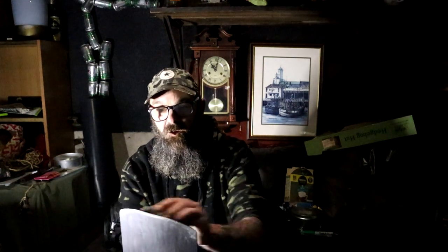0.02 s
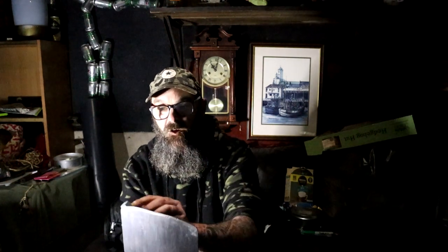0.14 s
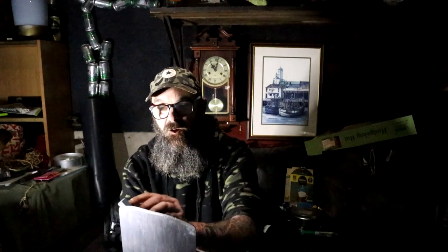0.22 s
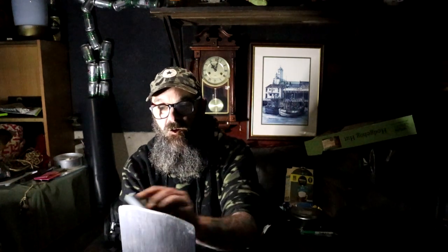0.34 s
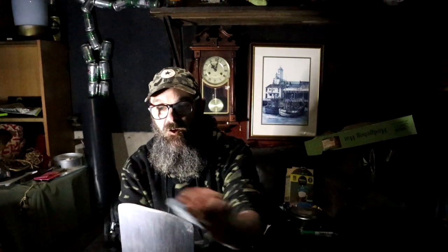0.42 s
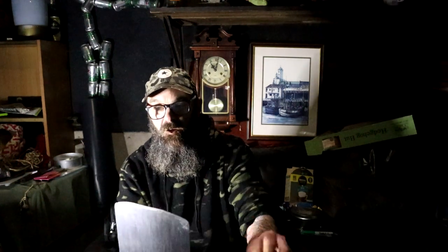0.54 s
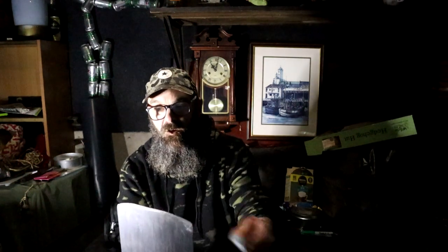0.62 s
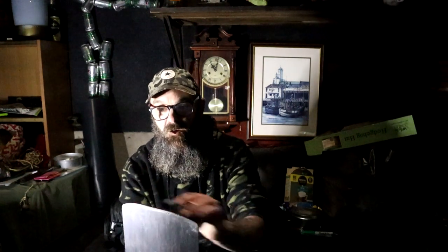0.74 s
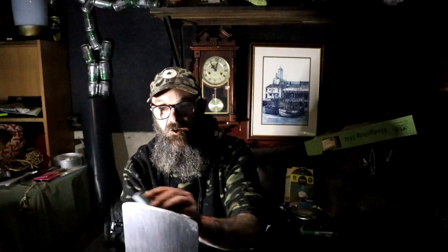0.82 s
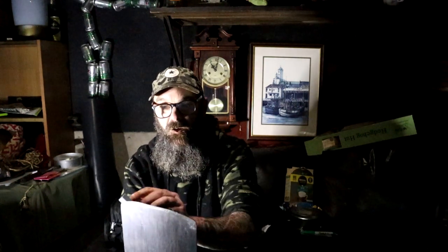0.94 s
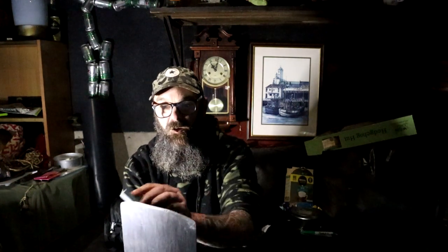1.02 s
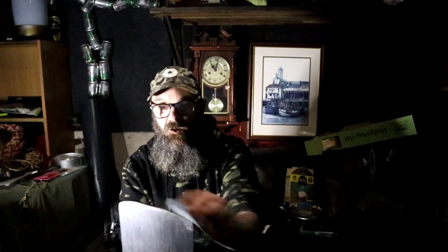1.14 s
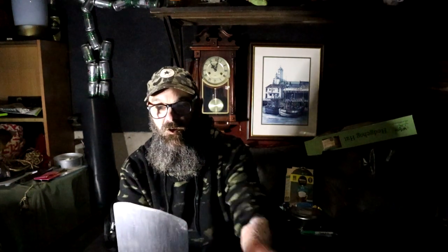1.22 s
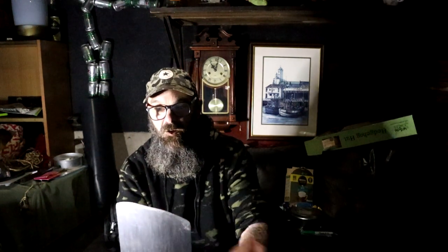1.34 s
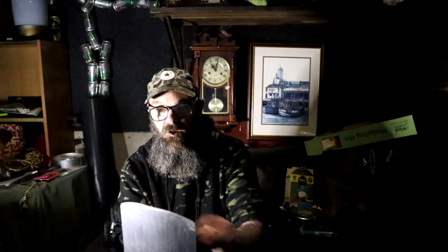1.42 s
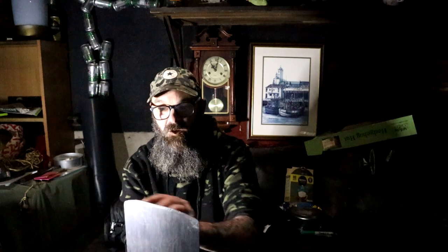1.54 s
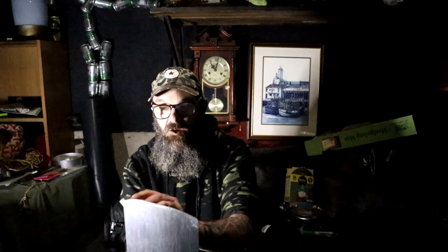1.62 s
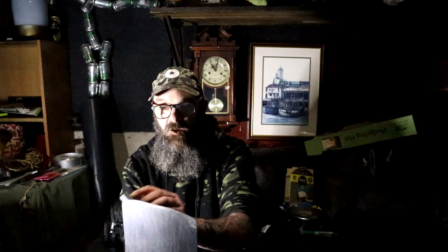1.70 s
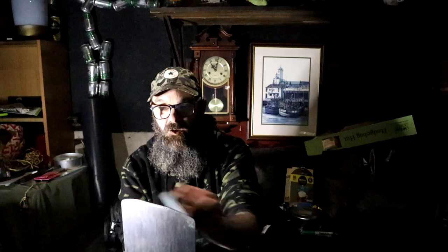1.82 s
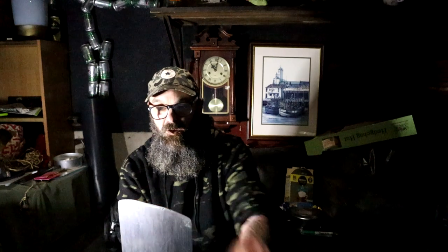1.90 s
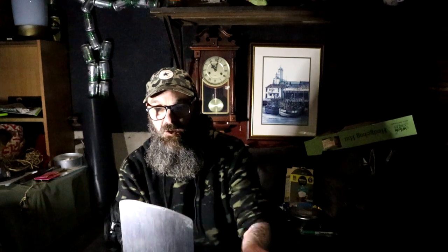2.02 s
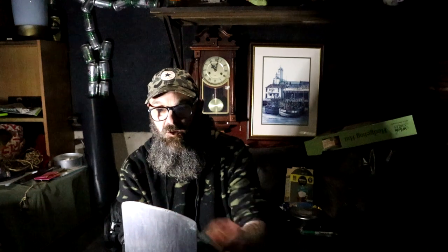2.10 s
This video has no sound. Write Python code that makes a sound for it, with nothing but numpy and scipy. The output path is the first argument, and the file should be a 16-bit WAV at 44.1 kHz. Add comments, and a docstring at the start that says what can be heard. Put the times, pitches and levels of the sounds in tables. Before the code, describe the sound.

Close and dry in a small shed: three quick abrasive strokes on thin steel, starting with a clink and growing harsher until the stone slips off and the blade rings briefly, with quiet creaking ticks during the back-swings.

```python
"""A sharpening stone strokes a steel spade three times in a small shed.
At first the blade still rings from the stroke before, and something under load, probably the handle or
the seat, creaks in dry ticks. Then, in each stroke, the stone knocks on the edge, drags lightly, bites in
a loud gritty rasp (grains shaking the blade's modes) and slips off, leaving the blade to ring freely.
While the arm swings back the creak returns, as it does after the last stroke."""
import sys
import numpy as np
from scipy import signal
from scipy.fft import rfft, irfft
from scipy.io import wavfile
from scipy.ndimage import uniform_filter1d, minimum_filter1d

SR = 44100
rng = np.random.default_rng(int(sys.argv[2]) if len(sys.argv) > 2 else 0)


def persist_wave(psi):
    """Save psi, clipped to +-1, as 16-bit WAV."""
    counts = np.round(np.clip(psi, -1, 1) * 32767).astype(np.int16)
    wavfile.write(sys.argv[1], SR, np.atleast_2d(counts).T)


N = 97020  # length of the scene in samples


def undb(db):
    """Turn decibels into a plain amplitude factor."""
    return 10 ** (np.asarray(db) / 20)


def unit(x):
    """Scale to rms 1."""
    return x / np.sqrt(np.mean(x ** 2))


def unit_hit(x):
    """Scale a short sound to rms 1 over its first hundredth of a second."""
    return x / np.sqrt(np.mean(x[:SR // 100] ** 2))


def colour(x, points):
    """Shape the spectrum of x through (Hz, dB) points, with a filter that never sounds early."""
    hz, db = np.array(points, float).T
    size = 2 * N
    f = np.maximum(np.fft.rfftfreq(size, 1 / SR), 1)
    log_gain = np.log(undb(np.interp(np.log(f), np.log(hz), db)))
    # folding the cepstrum gives the minimum-phase filter
    cepstrum = irfft(log_gain)
    cepstrum[1:N] *= 2
    cepstrum[N + 1:] = 0
    return irfft(rfft(x, size) * np.exp(rfft(cepstrum)))[:N]


def resonate(x, modes):
    """Ring (Hz, width Hz, dB) resonances; wide ones die fast, and each pushes or pulls the air."""
    t = np.arange(SR // 6) / SR
    ring = np.zeros(len(t))
    for hz, width, db in modes:
        strength = rng.choice([-1, 1]) * undb(db) * width
        ring += strength * np.exp(-np.pi * width * t) * np.cos(2 * np.pi * hz * t)
    return signal.oaconvolve(x, ring)[:N]


def flutter(rate_hz):
    """A random wobble of rms 1: straight lines between rate_hz random points per second."""
    points = rng.standard_normal(N // 20)
    return unit(np.interp(np.arange(N) / SR * rate_hz, np.arange(N // 20), points))


def place(x, start_s):
    """Delay a sound to its moment."""
    return np.concatenate([np.zeros(max(int(start_s * SR), 0)), x])[:N]


# The strokes. Each row: stone lands in seconds, stone leaves in seconds, relative level of the free ring in dB.
STROKE_TIMES = [(0.1967, 0.514, 0), (0.9694, 1.241, -.5), (1.666, 1.939, -.5)]
# How each stroke scrapes, one list per stroke. Each row: time in seconds, level of the rasp in dB,
# level of the low grind in dB (both before the slopes and balance below).
SCRAPE_LEVELS = [
    [(0.196, -24, -25.5), (0.222, -23.5, -32), (0.228, -21.5, -35), (0.264, -36, -41.5),
     (0.272, -25.5, -64.5), (0.294, -38.5, -47), (0.31, -24.5, -54), (0.368, -29.5, -29.5),
     (0.39, -11, -32), (0.458, -8.5, -15), (0.484, -12, -22.5), (0.496, -3.5, -28.5), (0.512, -24.5, -38)],
    [(0.985, -16, -22), (1.001, -33.5, -35), (1.053, -30, -34), (1.093, -19.5, -23.5), (1.101, -15, -24.5),
     (1.165, -9.5, -17), (1.177, -10, -14), (1.193, -12, -22), (1.211, -9, -28), (1.217, -5, -33.5),
     (1.238, -18.5, -42)],
    [(1.675, -29, -29), (1.685, -28.5, -21), (1.703, -25, -52.5), (1.743, -37, -47), (1.753, -29.5, -55),
     (1.763, -26.5, -49), (1.793, -22.5, -29), (1.799, -16.5, -31), (1.831, -14, -28), (1.837, -10, -33),
     (1.871, -6.5, -11.5), (1.925, -10.5, -31), (1.934, -14, -25.5)],
]
# Spectrum of the bright rasp. Each row: frequency in Hz, relative level in dB per Hz.
RASP_SPECTRUM = [(1000, -44.5), (2000, -17.5), (2800, 2.5), (4000, 3.5), (5000, -3.5), (5700, -2),
                 (6500, -12.5), (7400, -2.5), (8400, 1.5), (9900, -7), (10900, -3.5), (11400, -13),
                 (12500, -10.5), (15500, -28.5)]
# Spectrum of the low grind. Each row: frequency in Hz, relative level in dB per Hz.
GRIND_SPECTRUM = [(200, -23), (420, -39), (540, -10), (800, -7), (1000, -4), (1400, -0.5), (1800, 1),
                  (2600, -5.5), (4000, -43.5)]
# Modes of the blade with the stone resting lightly on it.
# Each row: frequency in Hz, width in Hz, relative level in dB.
LIGHT_MODES = [(1130, 16, -9), (1430, 24, -3), (2190, 90, -10), (2510, 69, -9), (2990, 40, -1),
               (3710, 44, 1), (4400, 110, -4), (4620, 61, -5), (5090, 130, -6), (5450, 55, -6),
               (6010, 55, -10), (7220, 30, -3.5), (7490, 66, -7), (8250, 55, -11), (8790, 68, -8),
               (9450, 89, -11), (10200, 69, -14), (10900, 140, -14), (12300, 150, -24), (15050, 90, -26)]
# Modes of the blade with the stone pressed hard. Each row: frequency in Hz, width in Hz, relative level in dB.
HARD_MODES = [(927, 38, -10), (1236, 32, -3), (1441, 32, 0), (1720, 90, -4), (2290, 80, -4), (2745, 45, -1),
              (3055, 55, 1), (3376, 45, -4.5), (3720, 40, 1), (3855, 55, 2), (4040, 90, -2), (4610, 130, 0),
              (4946, 80, 0), (5090, 60, -1), (5454, 35, -2), (6005, 55, -5), (7204, 40, -2), (7461, 55, -1),
              (7992, 50, -2), (8291, 45, -2), (9300, 160, -6), (10163, 40, -4), (10865, 90, -6),
              (12530, 70, -12), (14000, 60, -19), (14550, 90, -19)]
LAND_S, RELEASE_S = 0.0032, 0.0013  # time to make contact; decay time as contact ends
JUDDER_HZ, JUDDER_DB = 110, 1.8
RASP_DB, GRIND_DB, LIGHT_DB, HARD_DB = -8.5, -4, -9.5, -4  # balance of the four parts
# rasp level at full pressure; dB each set of modes grows per dB of rasp
FULL_DB, LIGHT_SLOPE, HARD_SLOPE = -7, 0.53, 1.68
GRIND_FULL_DB, GRIND_SLOPE = -15.5, 1.28  # the low grind dies away quickly as the pressure eases


def scraping(t):
    """Grit makes a bright rasp, a low grind when pressed hard, and rings the damped blade."""
    rasp, grind, light, hard = np.zeros((4, N))
    for (land, lift, _), rows in zip(STROKE_TIMES, SCRAPE_LEVELS):
        row_s, row_rasp_db, row_grind_db = np.array(rows).T
        contact = np.clip((t - land) / LAND_S, 0, 1) * np.exp(-np.maximum(t - lift, 0) / RELEASE_S)
        contact = contact * undb(JUDDER_DB * flutter(JUDDER_HZ))  # the stone judders in the hand
        rasp_db = np.interp(t, row_s, row_rasp_db)
        grind_db = np.interp(t, row_s, row_grind_db)
        rasp += contact * undb(rasp_db)
        light += contact * undb(FULL_DB + LIGHT_SLOPE * (rasp_db - FULL_DB))
        hard += contact * undb(FULL_DB + HARD_SLOPE * (rasp_db - FULL_DB))
        grind += contact * undb(GRIND_FULL_DB + GRIND_SLOPE * (grind_db - GRIND_FULL_DB))
    rasp_sound = rasp * unit(colour(grit(), RASP_SPECTRUM))
    grind_sound = grind * unit(colour(grit(), GRIND_SPECTRUM))
    direct = undb(RASP_DB) * rasp_sound + undb(GRIND_DB) * grind_sound
    blade = undb(LIGHT_DB) * rub(light, LIGHT_MODES) + undb(HARD_DB) * rub(hard, HARD_MODES)
    return direct + blade


GRIT_PER_S, GRIT_SPREAD_DB = 4500, 2  # average catches per second; average extra size of a catch
CHATTER_HZ, CHATTER_DB = 393.3, 1.5


def grit():
    """Abrasive grains catch on the steel at random, stronger and weaker with the chatter of the stone."""
    caught = rng.random(N) < GRIT_PER_S / SR
    extra = np.minimum(rng.exponential(size=N), 2 * np.pi)  # a cap on the largest catches
    push_or_pull = rng.choice([-1, 1], N)
    return caught * undb(GRIT_SPREAD_DB * extra) * push_or_pull * undb(CHATTER_DB * flutter(CHATTER_HZ))


MODE_WANDER_HZ, MODE_WANDER_DB = 27.815, 1.5  # the moving stone feeds now one mode, now another


def rub(force, modes):
    """Drive each mode with grit; its share wanders as the stone crosses still points of the blade."""
    push = grit() * force
    ring = np.zeros(N)
    for mode in modes:
        ring += resonate(push, [mode]) * undb(MODE_WANDER_DB * flutter(MODE_WANDER_HZ))
    return unit(ring) * np.sqrt(np.mean(force ** 2))  # as strong overall as the force


# Knocks of the stone as it lands or catches on the edge. Each row: start in seconds, level in dB.
KNOCK_HITS = [(.1945, -20.5), (.229, -30.5), (.2415, -27.5), (.269, -27.5), (.3215, -32.5), (.3875, -12),
              (.422, -9), (.9725, -6.5), (1.668, -18.5), (1.7975, -21.5)]
# Spectrum of the crack in a knock. Each row: frequency in Hz, relative level in dB per Hz.
KNOCK_SPECTRUM = [(100, -21), (300, -16), (600, -5.5), (1400, -9.5), (2400, -8.5), (3000, 12.5),
                  (4000, -7.5), (5000, -3), (8000, -6), (11000, -16.5), (16000, -30.5)]
KNOCK_DECAY_S, CLINK_DAMP_S, CRACK_DB, CLINK_DB = 0.0025, .02, -7, -1.5
# the clink's modes are turned down by this much per octave either side of the centre
CLINK_CENTRE_HZ, CLINK_TILT_DB = 3080, -10


def knocks(t):
    """The stone lands or catches: a short crack and a quickly damped clink."""
    modes = []
    for hz, width, db in LIGHT_MODES:
        octaves_away = abs(np.log2(hz / CLINK_CENTRE_HZ))
        modes.append((hz, width, db + CLINK_TILT_DB * octaves_away))
    out = np.zeros(N)
    for start_s, db in KNOCK_HITS:
        burst = rng.standard_normal(N) * np.exp(-t / KNOCK_DECAY_S)
        crack = unit_hit(colour(burst, KNOCK_SPECTRUM))
        clink = unit_hit(resonate(signal.unit_impulse(N), modes) * np.exp(-t / CLINK_DAMP_S))
        out += undb(db) * place(undb(CRACK_DB) * crack + undb(CLINK_DB) * clink, start_s)
    return out


LOW_CUT_HZ = 260  # the blade radiates little below this


def radiate(x):
    """The thin blade cancels its own bass."""
    return signal.sosfilt(signal.butter(2, LOW_CUT_HZ, "high", fs=SR, output="sos"), x)


# Modes of the free blade. Each row: frequency in Hz, relative level in dB as the stone leaves,
# time to fade by 60 dB in seconds.
FREE_BLADE_MODES = [(619, -44.5, .33), (958.5, -41, .34), (1167, -41.5, 1.25), (1366, -40, 1.15),
                    (2040, -38, .18), (2150, -40, .2), (1445.5, -29, .32), (1610, -33, .35),
                    (2262, -29, .13), (2525, -26, .57), (3070, -39, .18), (3714.5, -19, .275),
                    (3833, -27, .16), (4045, -22, .22), (4540, -40, .15), (4856, -40, .15),
                    (5685, -46, .14), (6002, -28.5, .1), (7074, -37, .09), (8177, -32, .1),
                    (8511, -40, .15), (10050, -49, .2), (10860, -34, .13)]
EARLIER_LIFT_S, EARLIER_RING_DB = -0.13, -7.5  # the blade still rings from the stroke before
RING_RISE_S = 0.013


def free_ring(t):
    """The blade's modes swell as the stone slips off and ring until it lands again."""
    lifts = [(EARLIER_LIFT_S, EARLIER_RING_DB)] + [(lift, db) for _, lift, db in STROKE_TIMES]
    landings = [row[0] for row in STROKE_TIMES] + [t[-1]]
    out = np.zeros(N)
    for (lift, ring_db), land in zip(lifts, landings):
        age = np.maximum(t - lift, 0)
        swell = np.minimum(t - lift, 0) / RING_RISE_S
        damping = np.maximum(t - land, 0) / RELEASE_S
        free = np.exp(swell - damping)
        for hz, db, t60 in FREE_BLADE_MODES:
            level = undb(ring_db + db + rng.standard_normal())  # varies a little at each stroke
            fade = np.exp(-np.log(1000) * age / t60)
            out += free * level * fade * np.sin(2 * np.pi * (hz * t + rng.random()))
    return out


# Ticks of the creak. Each row: start in seconds, level in dB.
CREAK_TICKS = [(.002, -45), (.012, -40.5), (0.022, -40.5), (.027, -41), (0.0353, -36), (.048, -36),
               (0.065, -35.5), (.1, -37.5), (.126, -36), (.726, -49.5), (.741, -52), (.747, -43.5),
               (.769, -42), (.782, -37.5), (.801, -35.5), (0.8365, -36), (0.9328, -44.5), (1.47, -42),
               (1.485, -46.5), (1.496, -41.5), (1.511, -41.5), (1.526, -36.5), (1.5698, -39), (1.64, -45),
               (2.123, -53), (2.136, -45.5), (2.151, -42), (2.166, -45), (2.18, -42), (2.195, -45)]
# Resonances of the creaking part. Each row: frequency in Hz, width in Hz, relative level in dB.
CREAK_RESONANCES = [(602, 38, -6), (1347, 150, -7), (2513, 480, -8.5), (3028, 52, 0.5), (3560, 8, -38),
                    (4060, 77, -3), (4620, 110, -7.5), (5650, 70, -11), (7200, 71, -26.5), (9300, 40, -44),
                    (9250, 55, -28)]
# Spectrum of the snap in a tick. Each row: frequency in Hz, relative level in dB per Hz.
TICK_SPECTRUM = [(120, -24.5), (280, 4), (550, -2), (900, -2.5), (1800, -12), (2300, 0.5), (4900, -6.5),
                 (5300, -12.5), (5600, -11.5), (6600, -21.5), (7700, -9.5), (11000, -24.5), (16000, -25)]
TICK_DECAY_S, TICK_RISE_S, TICK_SNAP_DB, TICK_BODY_DB = .0038, .00075, -6, -3.5


def creaking(t):
    """Stick-slip ticks: each a dry snap of its own, all ringing the same part."""
    slips = np.zeros(N)
    for start_s, db in CREAK_TICKS:
        slips[max(int(start_s * SR), 0)] += undb(db)
    rise = 1 - np.exp(-t / TICK_RISE_S)
    snap_shape = unit_hit(rise * np.exp(-t / TICK_DECAY_S))
    noise = unit(colour(rng.standard_normal(N), TICK_SPECTRUM))
    snaps = signal.fftconvolve(slips, snap_shape)[:N] * noise
    part_ring = unit_hit(rise * resonate(signal.unit_impulse(N), CREAK_RESONANCES))
    body = signal.fftconvolve(slips, part_ring)[:N]
    return undb(TICK_SNAP_DB) * snaps + undb(TICK_BODY_DB) * body


# Spectrum of the late echo. Each row: frequency in Hz, relative level in dB.
LATE_SPECTRUM = [(300, -24.5), (800, -7), (1200, -11.5), (1650, -8.5), (1900, -4), (2130, 13), (2450, -0.5),
                 (3050, 0.5), (3400, -4.5), (4500, -8.5), (6000, -14.5), (12000, -22.5)]
# Spectrum of the steady background. Each row: frequency in Hz, relative level in dB per Hz.
SHED_SPECTRUM = [(20, -3.5), (40, -6.5), (80, -9), (160, -12), (300, -11.5), (600, -12.5), (1300, -16.5),
                 (2000, -24.5), (4000, -25.5), (8000, -32.5), (16000, -32)]
EARLY_T60_S, EARLY_DB, EARLY_DELAY_S = 0.095, -12, .004  # T60: time to fade by 60 dB
LATE_T60_S, LATE_DB, SHED_DB = 0.18, -25.5, -56.5


def shed(x, t):
    """A short, cluttered room with a faint late echo, over a steady rumble and hiss."""
    early = place(rng.standard_normal(N) * np.exp(-np.log(1000) * t / EARLY_T60_S), EARLY_DELAY_S)
    late = colour(rng.standard_normal(N), LATE_SPECTRUM) * np.exp(-np.log(1000) * t / LATE_T60_S)
    room = undb(EARLY_DB) * early / np.linalg.norm(early) + undb(LATE_DB) * late / np.linalg.norm(late)
    echo = signal.fftconvolve(x, room)[:N]
    background = undb(SHED_DB) * unit(colour(rng.standard_normal(N), SHED_SPECTRUM))
    return x + echo + background


def scene():
    """Stone, blade and creak in the shed."""
    t = np.arange(N) / SR
    stone_on_blade = radiate(scraping(t) + knocks(t))
    return shed(stone_on_blade + free_ring(t) + creaking(t), t)[None]


CEILING, LIMIT_S, TOP_HZ = .93, .002, 15900  # highest peak let through; window of the limiter; treble cut


def record(dry):
    """A fast limiter holds the highest peaks; the top is cut."""
    size = int(LIMIT_S * SR)
    needed_gain = CEILING / np.maximum(abs(dry), CEILING)
    gain = uniform_filter1d(minimum_filter1d(needed_gain, size), size)
    top_cut = signal.ellip(10, .1, 60, TOP_HZ, fs=SR, output="sos")
    return signal.sosfiltfilt(top_cut, dry * gain)


dry = scene()
out = record(dry)
persist_wave(out)
```